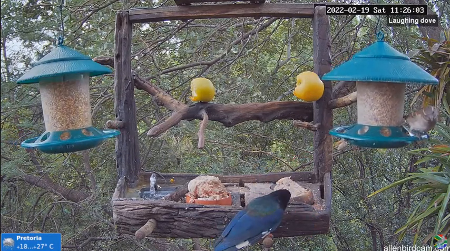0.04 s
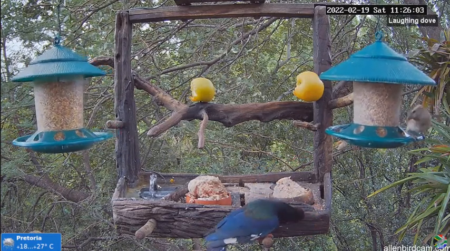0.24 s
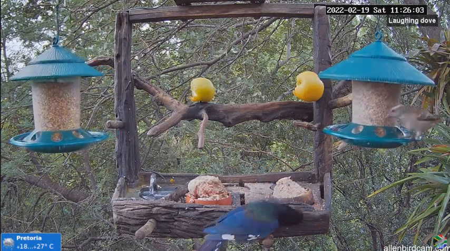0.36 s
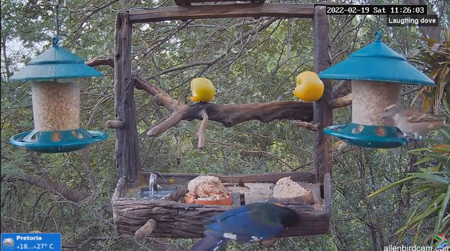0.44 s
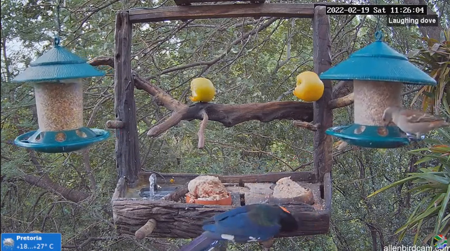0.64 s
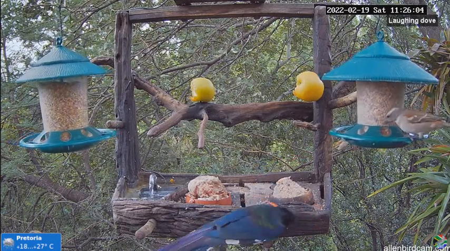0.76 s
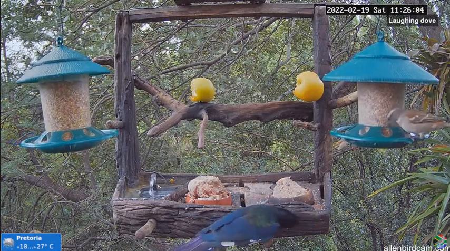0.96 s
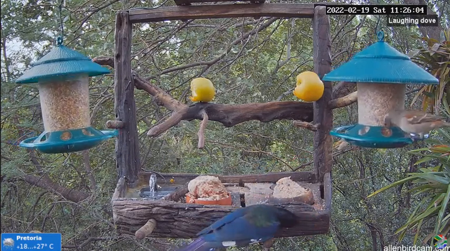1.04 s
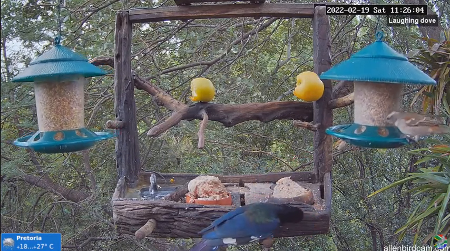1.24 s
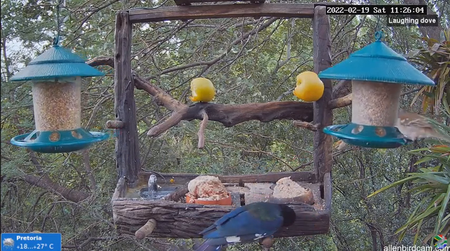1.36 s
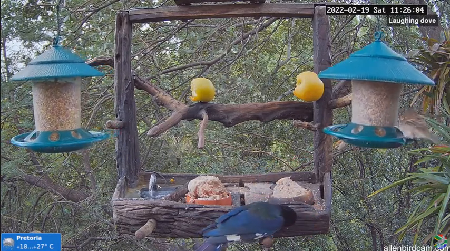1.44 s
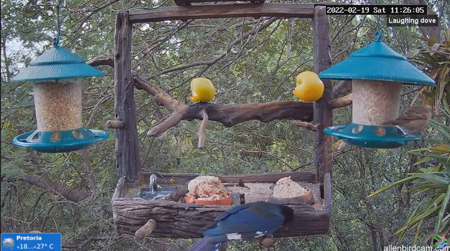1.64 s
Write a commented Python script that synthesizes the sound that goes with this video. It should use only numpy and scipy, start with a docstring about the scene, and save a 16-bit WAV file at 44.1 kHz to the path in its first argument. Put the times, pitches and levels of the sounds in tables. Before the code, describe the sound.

Birds give two harsh, bright calls just after a quick flutter of wings near the microphone. Softer chatter, high peeps and a falling whistle follow, among light pecks and cracking seed husks, with a short echo from the garden trees.

```python
"""Birds at a garden feeder, heard with almost no bass over faint air and a short echo from the trees.
First wings flutter close by, each stroke a swish with feather overtones falling in a zip. Two harsh calls
follow, uneven pulses and puffs of noise with a bright, ringing colour. Then the flock chatters,
with thin peeps and one falling whistle, and a faint last rasp comes near the end. Throughout, beaks set
the feeder ringing in short ticks, among soft rustles and a few cracking seed husks."""
import sys
import numpy as np
from scipy import signal
from scipy.fft import rfft, irfft, next_fast_len
from scipy.io import wavfile
from scipy.ndimage import uniform_filter1d, map_coordinates

SR = 44100
rng = np.random.default_rng(int(sys.argv[2]) if len(sys.argv) > 2 else 0)


def waveform_to_disk(signal):
    """Save audio, clipped to [-1, 1], as 16-bit WAV at the path in sys.argv[1]."""
    frames = np.transpose(np.atleast_2d(signal))
    scaled = np.clip(frames, -1, 1) * 32767
    samples = np.round(scaled).astype(np.int16)
    wavfile.write(sys.argv[1], SR, samples)


N = 74970

# reverberation among the trees (frequency [Hz], time to fall 60 dB [s])
TREE_DECAY = [(800, 0.44), (5600, 0.29)]
# spectra of the air, centre and side (frequency [Hz], gain [dB])
AIR_SPECTRUM = [(25, -30.5), (400, -28), (1500, 0), (2800, 0.5), (4500, -16), (7000, -13.5), (15000, -26)]
AIR_SIDE_SPECTRUM = [(25, -30.5), (500, -21.5), (1200, 4.5), (2400, 2.5), (4000, -18.5)]
# loudness of the flock (time [s], level [dB])
FLOCK_LEVELS = [(0, -76), (0.05, -81), (0.092, -76), (0.597, -64), (0.658, -85), (0.749, -79.5),
                (0.779, -64), (0.851, -55), (0.901, -64), (1.003, -59), (1.049, -66), (1.169, -62),
                (1.348, -60), (1.442, -67.5), (1.499, -61.5), (1.551, -66), (1.601, -65.5), (1.7, -67.5)]
# rustles (time [s], length [s], centre frequency [Hz], level [dB])
RUSTLES = [(0, 0.033, 2904, -64), (0.574, 0.027, 2270, -66), (0.649, 0.0043, 1690, -68.5),
           (0.838, 0.0059, 1266, -68), (0.939, 0.039, 949.4, -77), (1.026, 0.036, 1762, -70.5),
           (1.308, 0.02, 1833, -66), (1.478, 0.012, 1516, -78.5), (1.583, 0.03, 1657, -73.5)]
# cracking husks (time [s], level [dB])
HUSK_CRACKS = [(0.124, -56.5), (1.299, -59.5), (1.5805, -51)]
# beak impacts (time [s], level [dB], ring frequency [Hz])
PECKS = [(0.276, -43, 2525), (0.3635, -54.5, 2980), (0.5927, -55, 2850), (0.6877, -59.5, 2747),
         (.728, -59.5, 2540), (0.8656, -46, 2110), (0.8642, -48.5, 3220), (1.074, -53, 2857),
         (1.1732, -40.5, 2926), (1.2975, -38.5, 2537), (1.325, -44.5, 3530), (1.324, -53, 2055),
         (1.6568, -47.5, 3426)]
# course of the whistle (time [s], pitch [Hz], level [dB])
WHISTLE_CONTOUR = [(0.767, 3708, -79), (0.784, 3863, -55), (0.809, 4055, -63.5), (0.858, 4040, -56.5),
                   (.893, 3470, -54.5), (.925, 2804, -58)]
# thin peeps (time [s], length [s], pitch [Hz], level [dB])
PEEP_NOTES = [(0.343, 0.017, 5810, -51.5), (0.666, 0.027, 5770, -58.5), (0.764, 0.017, 5790, -53.5),
              (0.812, 0.029, 5970, -52), (0.97, 0.033, 6000, -62.5), (1.058, 0.028, 5620, -56),
              (1.113, 0.03, 5715, -54), (1.19, 0.033, 5437, -54.5), (1.251, 0.03, 5900, -54.5),
              (1.326, 0.049, 5877, -54.5), (1.383, 0.028, 5747, -51.5), (1.469, 0.017, 5660, -52.5),
              (1.527, 0.028, 6010, -56.5), (1.617, 0.019, 5763, -55.5), (1.671, 0.022, 5860, -56.5)]
# wing strokes (time [s], level [dB])
WING_STROKES = [(0.048, -54.5), (0.0966, -48), (0.144, -46.5), (0.193, -45.5), (.232, -57)]
# bursts of effort in the harsh calls (time [s], rise [s], hold [s], level [dB])
RASP_BURSTS = [(0.164, 0.018, 0.03, -40.5), (0.377, 0.026, 0.002, -34), (0.402, 0.016, 0.0064, -46.5),
               (0.473, 0.0064, 0.019, -48.5), (1.471, 0.0073, 0.0058, -55.5)]
# filter responses that colour each sound (frequency [Hz], gain [dB])
FLOCK_SPECTRUM = [(500, -46.5), (1080, -41), (1500, -14), (2300, -28.5), (3000, -0.5), (3750, -0.5),
                  (4650, -15), (5750, 2), (6300, -11.5), (6900, 2), (7800, -12), (9400, -16.5),
                  (10200, -37.5), (11600, -29.5), (14000, -55)]
HUSK_SPECTRUM = [(1500, -38.5), (6000, -15), (7600, 14.5), (10000, -24), (15000, -24.5)]
PECK_SPECTRUM = [(400, -44.5), (1800, 1.5), (3700, 0), (10000, -29.5)]
WING_SPECTRUM = [(700, -45), (1200, -17.5), (2100, -13), (2550, -11), (3100, -1), (3800, -15), (5200, -13),
                 (9000, -34.5)]
RASP_SPECTRUM = [(500, -74), (800, -40.5), (960, -38), (1260, -23.5), (1520, -14), (1850, -27),
                 (3100, -25.5), (3700, -2), (3950, -2.5), (4300, -17.5), (5020, -15), (5450, -0.5),
                 (5880, -0.5), (6250, -12), (6950, -5.5), (8300, -22.5), (9150, -15.5), (10700, -39),
                 (12000, -27), (14000, -56.5)]

TIME = np.arange(N) / SR


def amp(db):
    """Amplitude ratio of a level in decibels."""
    return 10 ** (np.asarray(db) / 20)


def unit(x):
    """Normalisation to rms 1."""
    return x / np.sqrt(np.mean(x ** 2) + 1e-20)


def along(points, hz):
    """Interpolation on a logarithmic frequency axis."""
    frequencies, values = np.transpose(points)
    return np.interp(np.log(hz + 1), np.log(frequencies + 1), values)


def wobble(rate):
    """Random modulation: a spline of rms 1 through `rate` knots a second."""
    return unit(map_coordinates(rng.standard_normal(N // 4), [TIME * rate], mode="wrap"))


def coloured(x, spectrum):
    """Minimum-phase filtering: folding the cepstrum makes the response causal."""
    size = 2 * next_fast_len(N)
    cepstrum = irfft(np.log(amp(along(spectrum, np.fft.rfftfreq(size, 1 / SR)))))
    cepstrum[1:size // 2] *= 2
    cepstrum[size // 2 + 1:] = 0
    return irfft(rfft(x, size) * np.exp(rfft(cepstrum)))[:N]


def envelope(start, rise, hold, t60):
    """Linear attack, hold, then exponential decay of 60 dB in t60 seconds."""
    t = TIME - start
    return np.clip(t / rise, 0, 1) * amp(-60 * np.maximum(t - rise - hold, 0) / t60)


def phase_of(hz):
    """Phase in radians as the integral of frequency."""
    return 2 * np.pi * np.cumsum(hz) / SR


def tree_echo(x, wet_db):
    """Scattering from the trees adds a diffuse tail whose treble decays sooner."""
    hz, t, bands = signal.stft(rng.standard_normal(SR // 2), SR, nperseg=256)
    tail = signal.istft(bands * amp(-60 * t / along(TREE_DECAY, hz)[:, None]), SR, nperseg=256)[1]
    tail *= np.minimum(np.arange(len(tail)) / SR / .023, 1)  # builds over 23 ms
    return x + amp(wet_db) * signal.fftconvolve(x, tail / np.linalg.norm(tail))[:N]


def frame_reflection(x, gain=.38, delay_s=.00491):
    """Comb filtering: the direct sound interferes with a reflection off the feeder's wooden frame."""
    delayed = np.pad(x, (round(delay_s * SR), 0))[:N]
    return (x + gain * delayed) / np.hypot(1, gain)


def air():
    """Ambient floor of uncorrelated noises, (centre, side): the centre wavers, the side fades."""
    centre = unit(coloured(rng.standard_normal(N), AIR_SPECTRUM))
    side = unit(coloured(rng.standard_normal(N), AIR_SIDE_SPECTRUM))
    return amp(-82 + 2 * wobble(25)) * centre, amp(-84 - 7 * TIME) * side


def flock():
    """Many small voices add incoherently into a scratchy wash of amplitude-modulated noise."""
    times, db = np.transpose(FLOCK_LEVELS)
    scratch = rng.standard_normal(N) * amp(2.2 * wobble(400) + 1.8 * wobble(50))
    return amp(np.interp(TIME, times, db)) * unit(coloured(scratch, FLOCK_SPECTRUM))


def rustles():
    """Narrow-band noise from random quadrature modulation; a flickering level makes it grainy."""
    out = np.zeros(N)
    for start, length, hz, db in RUSTLES:
        phase, width_hz = 2 * np.pi * hz * TIME, .3 * hz
        band = wobble(width_hz) * np.sin(phase) + wobble(width_hz) * np.cos(phase)
        grain = amp(3 * wobble(120))
        out += amp(db) * unit(band * grain) * envelope(start, .003, length, t60=.035)
    return out


def husks():
    """Brittle fracture: each seed husk releases a brief burst of bright noise."""
    bursts = sum(amp(db) * envelope(start, .00096, 0, t60=.034) for start, db in HUSK_CRACKS)
    return coloured(rng.standard_normal(N) * bursts, HUSK_SPECTRUM)


def pecks(rise_s=.0011, sag=.16, sag_s=.002):
    """Damped vibration after a beak's impact: the pitch starts high and sags to the ring frequency."""
    out = np.zeros(N)
    for start, db, hz in PECKS:
        t = np.maximum(TIME - start, 0)
        phase = 2 * np.pi * hz * (t + sag * sag_s * (1 - np.exp(-t / sag_s)))
        snap = .8 * envelope(start, rise_s, 0, t60=.0062)
        ring = .72 * envelope(start, rise_s, 0, t60=.021)
        out += amp(db) * np.sin(phase) * uniform_filter1d(snap + ring, round(rise_s * SR / 2))
    return coloured(out, PECK_SPECTRUM)


def whistle():
    """Frequency glide: a nearly pure tone lifts, holds and drops away at its end."""
    times, hz, db = np.transpose(WHISTLE_CONTOUR)
    pitch = np.interp(TIME, times, hz) * (1 + .009 * wobble(450))
    level = np.interp(TIME, times, db, left=-200, right=-200) + 1.9 * wobble(150)
    return amp(level) * np.sin(phase_of(pitch))


def peeps(flick_s=.0022, rise_s=.004, noise_share=.2):
    """Modulation sidebands roughen thin tones; the shorter the note, the more it flicks downward."""
    out = np.zeros(N)
    for start, length, hz, db in PEEP_NOTES:
        flick = (flick_s / length) ** 2 * np.interp(TIME, [start, start + length], [1, -1])
        phase = phase_of(hz * (1 + flick + .014 * wobble(700)))
        sidebands = (wobble(330) * np.sin(phase) + wobble(330) * np.cos(phase)) / np.sqrt(2)
        overtone = amp(-44.5) * np.sin(2 * phase)
        tone = np.sqrt(1 - noise_share) * np.sin(phase) + np.sqrt(noise_share) * sidebands + overtone
        out += amp(db + 2 * wobble(230)) * tone * envelope(start, rise_s, length - rise_s, t60=.04)
    return out


def wings(start_hz=1120, fall_s=.024, hold_s=.01, t60=.042):
    """Each stroke is a swish plus a falling chirp of feather harmonics 2 to 6; gives (centre, side)."""
    strokes, lowest = np.zeros(N), np.zeros(N)
    for start, db in WING_STROKES:
        plunge = np.exp(-np.clip(TIME - start, 0, .05) / fall_s)
        phase = phase_of(start_hz * plunge * (1 + .025 * wobble(600)))
        harmonics = sum(amp(-8 * max(k - 4, 0)) * np.sin(k * phase + rng.uniform(0, 2 * np.pi))
                        for k in range(2, 7))
        swish = rng.standard_normal(N)
        strokes += amp(db) * (harmonics + swish) * envelope(start, .0005, hold_s, t60)
        lowest += amp(db) * np.sin(2 * phase) * envelope(start, .003, hold_s, t60)
    centre = coloured(strokes, WING_SPECTRUM)
    quadrature = signal.hilbert(centre).imag  # a 90-degree shift gives width
    wide = coloured(lowest, [(600, -30), (1100, 0)])  # the lowest overtone spreads furthest
    return centre, amp(-6) * quadrature + amp(-8.5) * wide


def rasps(pitch_hz=427.7, jitter=.06, noise_share=.4):
    """Source and filter: uneven pulses and puffs of noise take on a bright, ringing colour."""
    cycles = phase_of(pitch_hz * (1 + jitter * wobble(350))) / (2 * np.pi)
    pulses = np.diff(np.floor(cycles), prepend=0) * amp(.49 * wobble(400))
    puffs = rng.standard_normal(N) * np.exp(-2.5 * (cycles % 1))
    source = np.sqrt(1 - noise_share) * unit(pulses) + np.sqrt(noise_share) * unit(puffs)
    effort = sum(amp(db) * envelope(start, rise, hold, t60=.084) for start, rise, hold, db in RASP_BURSTS)
    steady_rms = np.std(coloured(source, RASP_SPECTRUM))
    return coloured(source * effort, RASP_SPECTRUM) / steady_rms


def scene():
    """Superposition in mid-side stereo: only the close wings and the faint air have width."""
    calls = frame_reflection(tree_echo(rasps(), wet_db=-8) + flock())
    tones = tree_echo(peeps(), wet_db=-3.5) + tree_echo(whistle(), wet_db=0)
    rustling = tree_echo(rustles(), wet_db=-10)
    wing_centre, wing_side = wings()
    close = tree_echo(wing_centre + pecks() + husks(), wet_db=-13.5)
    air_centre, air_side = air()
    mid = air_centre + rustling + close + tones + calls
    side = air_side + tree_echo(wing_side, wet_db=-16.5)
    return np.array([mid + side, mid - side])


def record(dry, top_hz=15400):
    """Band limiting: an ideal low-pass filter removes everything above top_hz."""
    size = next_fast_len(N + SR // 2)
    passband = np.fft.rfftfreq(size, 1 / SR) < top_hz
    return irfft(rfft(dry, size) * passband, size)[:, :N]


dry = scene()
out = record(dry)
waveform_to_disk(out)
```